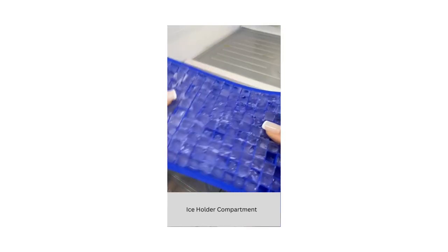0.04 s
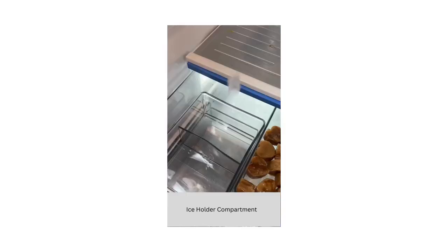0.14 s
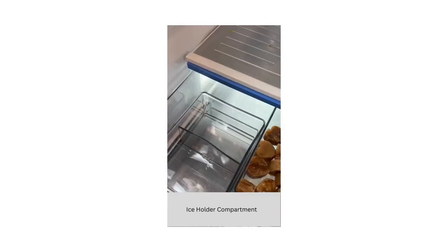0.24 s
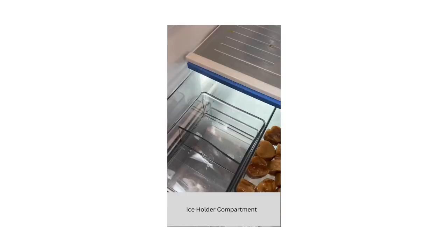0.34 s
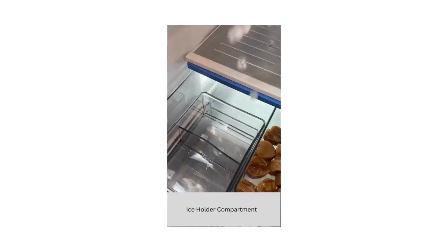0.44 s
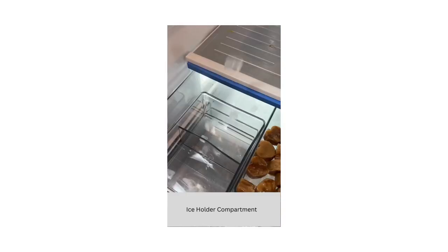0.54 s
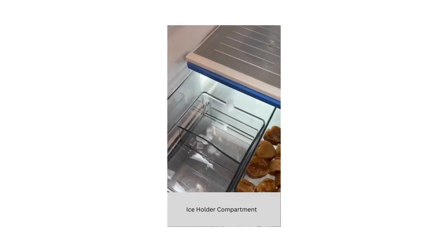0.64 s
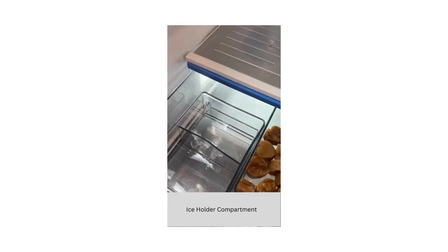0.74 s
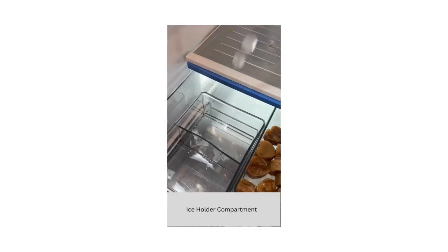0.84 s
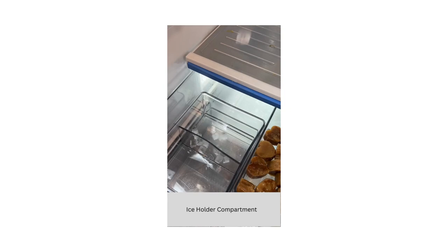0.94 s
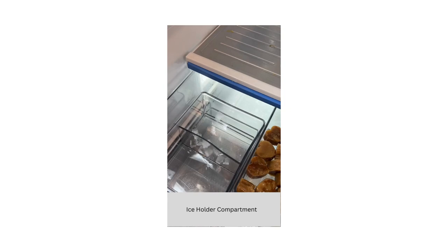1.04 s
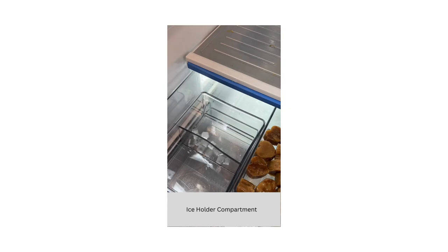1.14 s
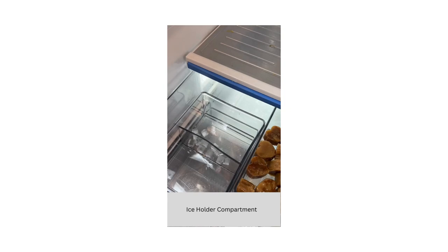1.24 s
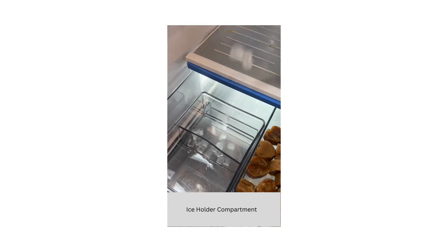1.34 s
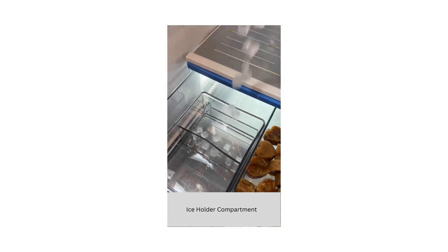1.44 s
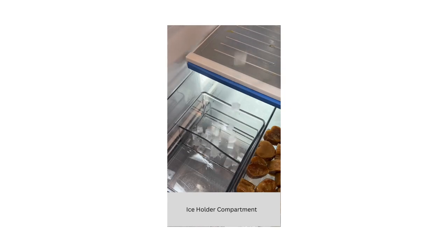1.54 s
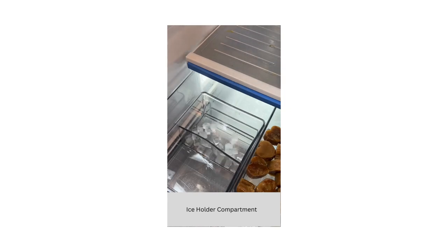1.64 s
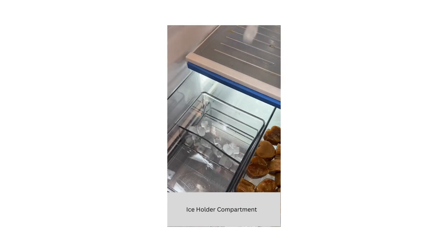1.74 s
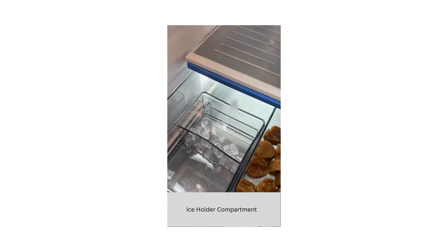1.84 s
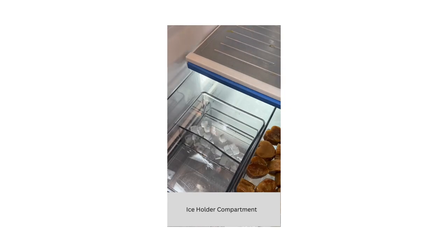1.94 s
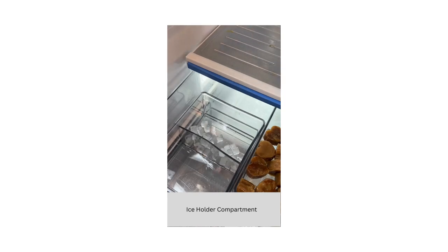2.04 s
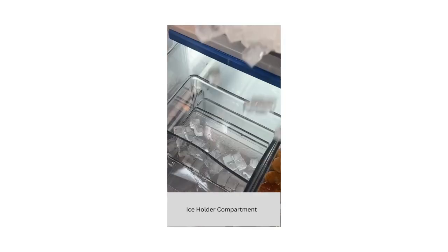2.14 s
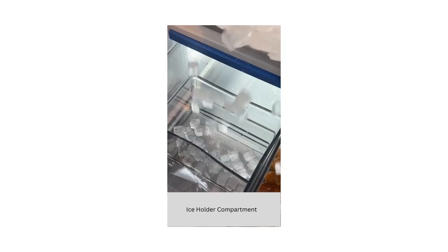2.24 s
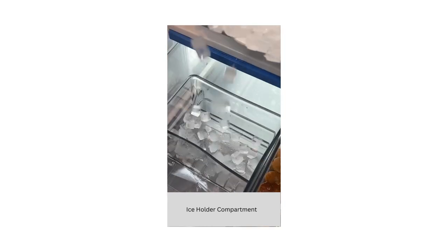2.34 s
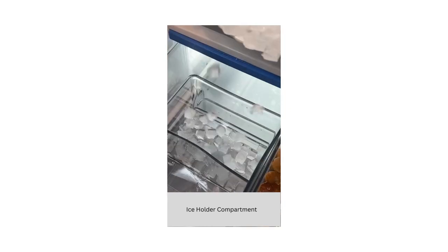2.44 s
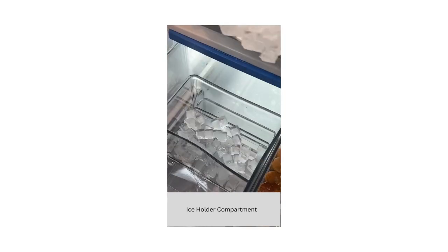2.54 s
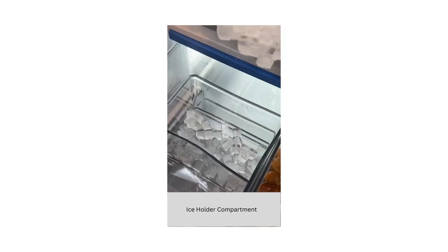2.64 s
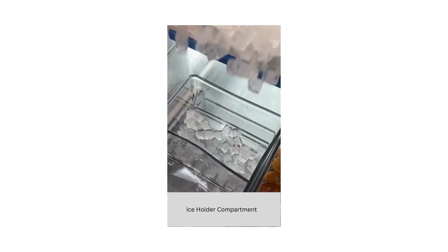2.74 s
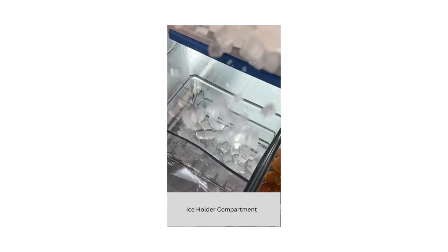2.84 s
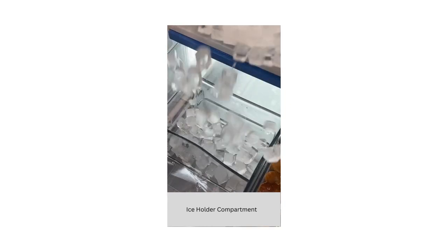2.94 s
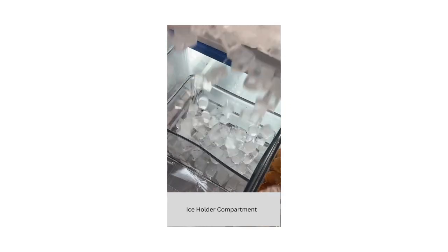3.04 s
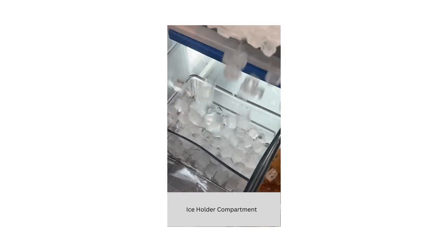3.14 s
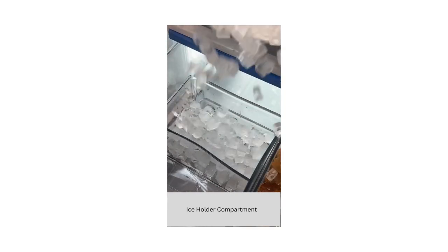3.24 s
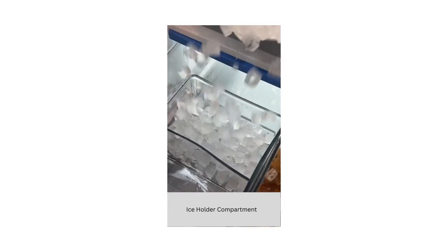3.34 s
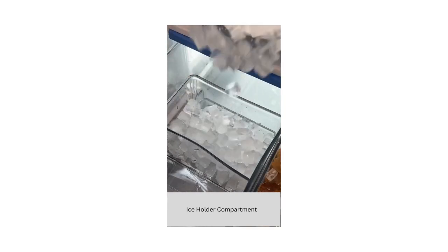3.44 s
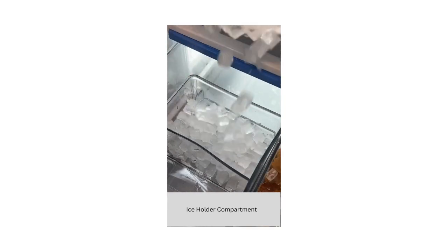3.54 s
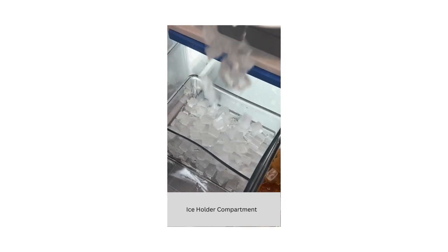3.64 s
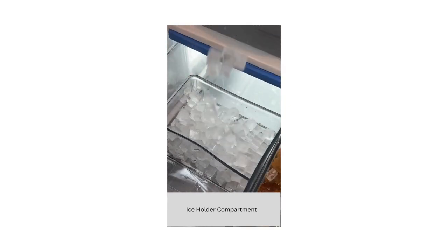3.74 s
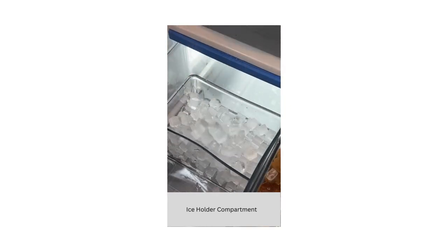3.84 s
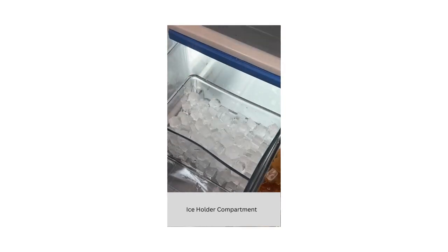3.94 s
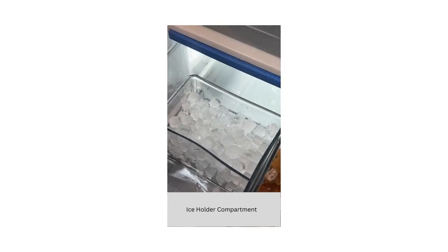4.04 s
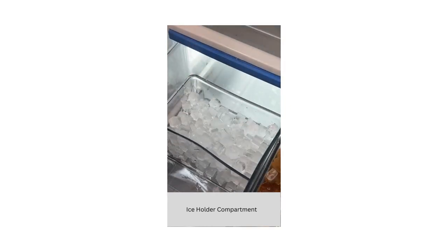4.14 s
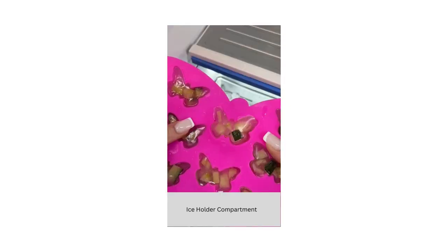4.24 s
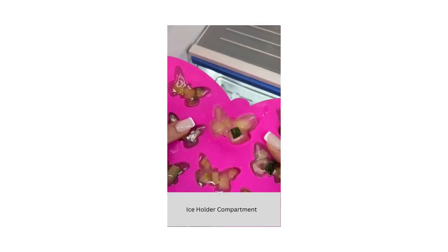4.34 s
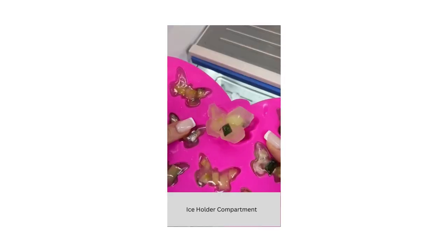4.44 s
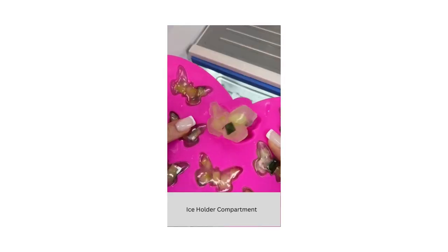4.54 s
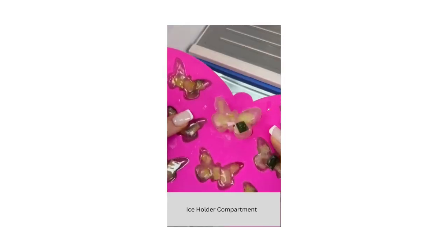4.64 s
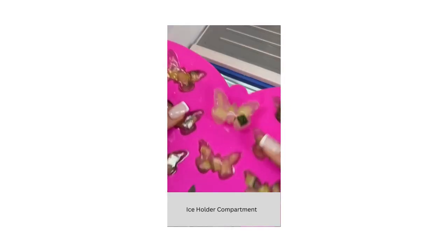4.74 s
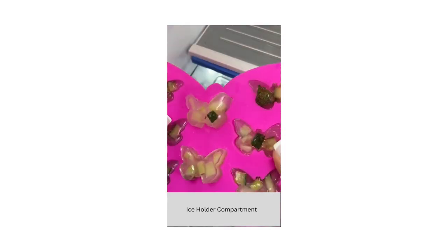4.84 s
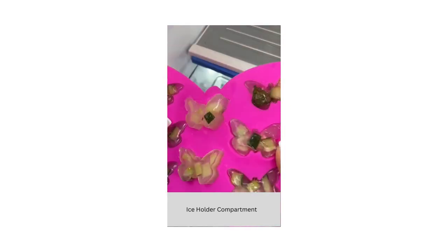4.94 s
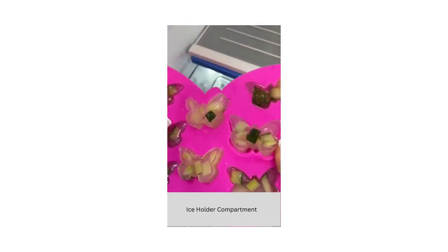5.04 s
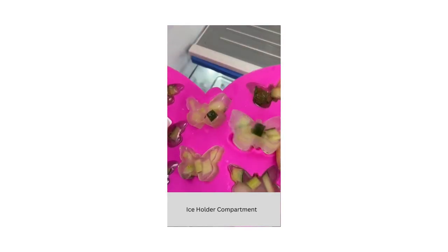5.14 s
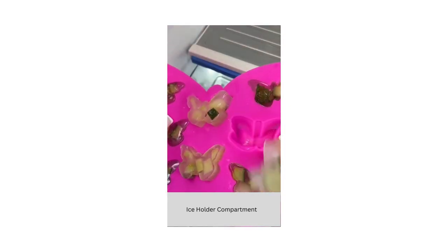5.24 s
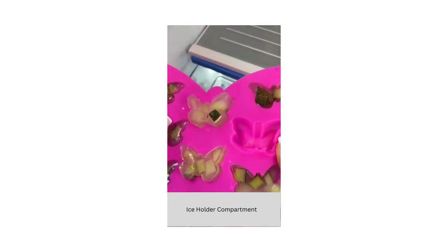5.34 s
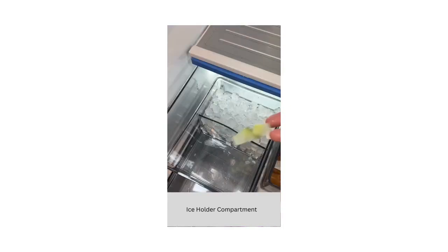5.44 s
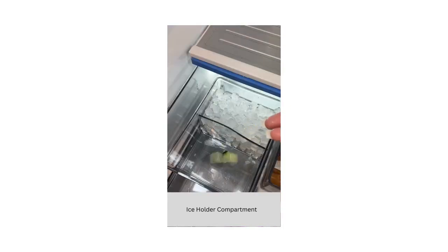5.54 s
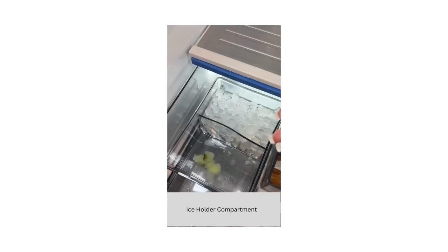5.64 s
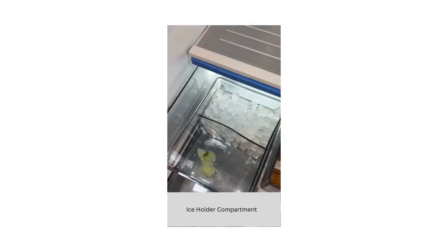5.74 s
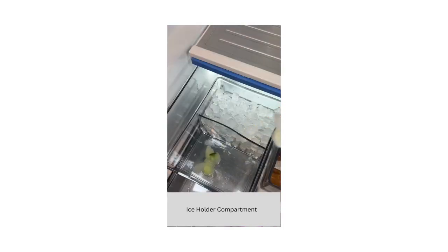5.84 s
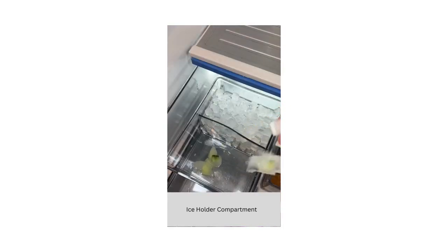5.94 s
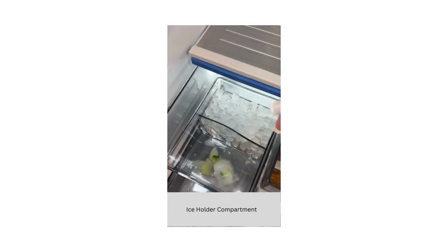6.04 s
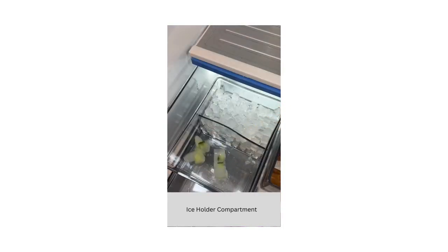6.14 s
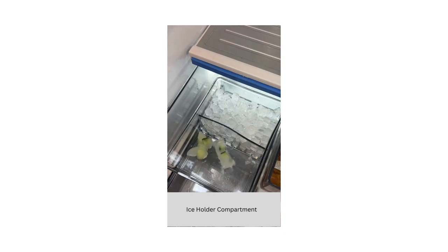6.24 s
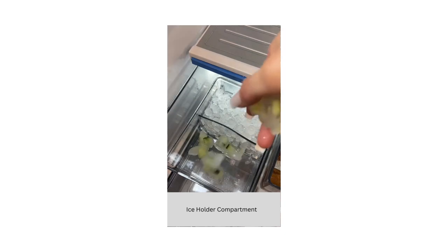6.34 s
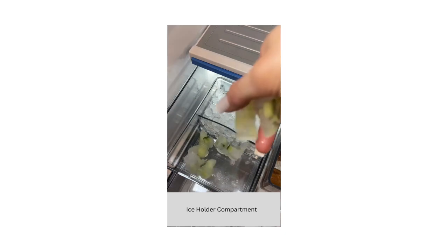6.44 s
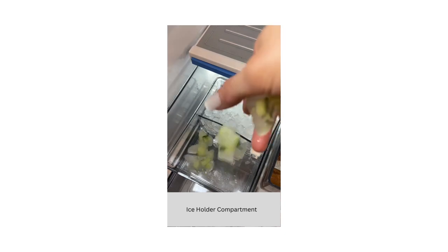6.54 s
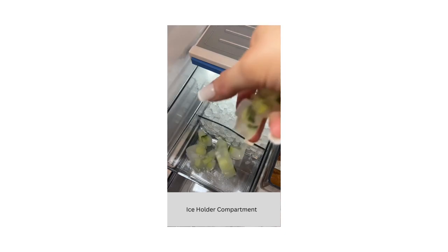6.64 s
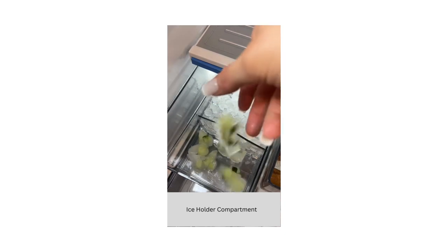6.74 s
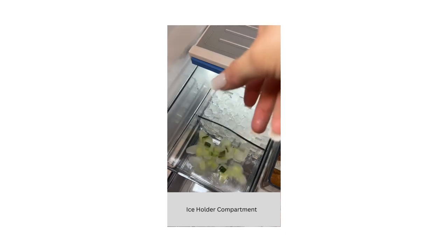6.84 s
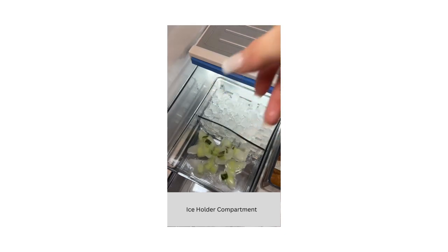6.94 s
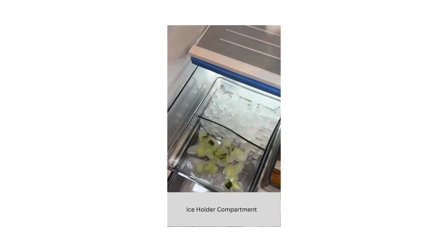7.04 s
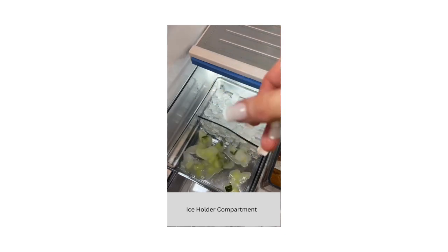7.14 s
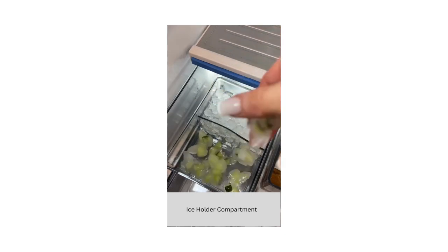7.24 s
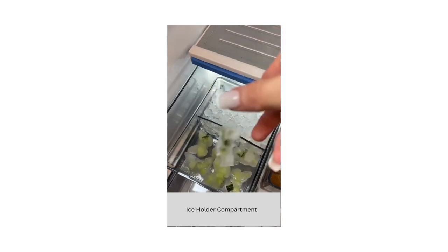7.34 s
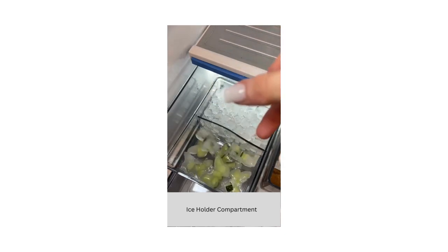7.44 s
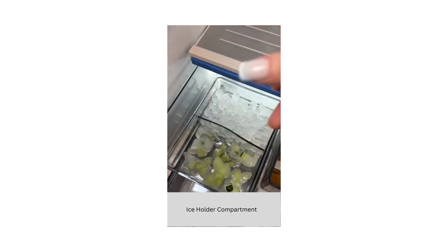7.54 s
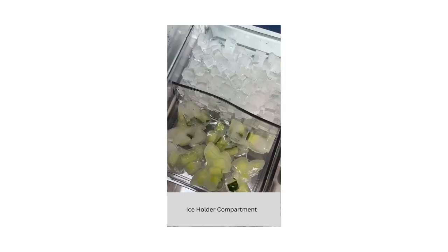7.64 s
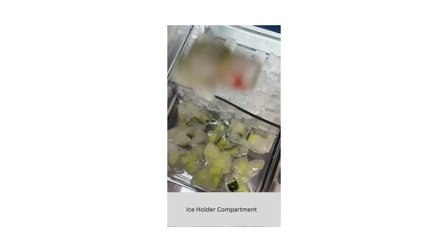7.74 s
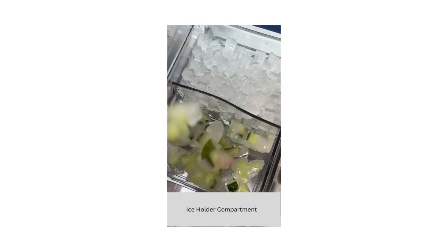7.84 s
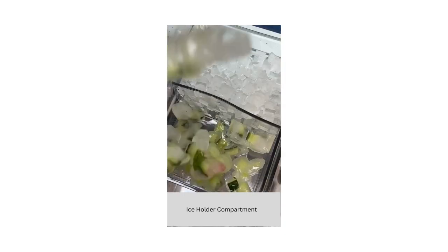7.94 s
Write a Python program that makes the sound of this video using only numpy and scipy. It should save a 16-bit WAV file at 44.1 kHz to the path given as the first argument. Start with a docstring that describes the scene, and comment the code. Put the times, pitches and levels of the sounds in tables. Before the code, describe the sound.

Close in a freezer drawer, small ice cubes hit a hard plastic bin in irregular bursts of bright clacks and hollow knocks. A big tray then empties in a dense clattering pour that thins out. After a quiet gap with faint flexible-tray crackle and soft bumps, larger moulded ice pieces land one after another, duller and heavier, over a faint low hum.

```python
"""Freezer drawer: ice is pressed out of silicone trays into a clear plastic bin. A few small cubes land,
a long pour follows, then larger moulded pieces drop by hand. Each blow sums damped modes: wall knock,
floor thump, ice clack and tick. Loose pieces rattle as filtered showers of small collisions; some ring on.
The flexed tray crackles, dull bumps sound, the drawer adds a short noise echo, the freezer hums."""
import sys
import numpy as np
from scipy import signal
from scipy.fft import rfft, irfft, next_fast_len
from scipy.io import wavfile
from scipy.ndimage import uniform_filter1d

SR = 44100
rng = np.random.default_rng(int(sys.argv[2]) if len(sys.argv) > 2 else 0)


def to_wav(s):
    """Save 16-bit WAV."""
    ch = np.atleast_2d(s).T  # columns
    pcm = np.round(np.clip(ch, -1, 1) * 32767)  # PCM
    wavfile.write(sys.argv[1], SR, pcm.astype(np.int16))


N = 352359
TIME = np.arange(N) / SR
RING = TIME[:8192]  # time axis of one ringing sound [s]

# small cubes landing; hardness is high on ice, low on plastic:
# (time [s], wall note [Hz], strength [dB], hardness [dB], floor thump [dB re strength])
CUBE_BLOWS = [(.2659, 1090, -20.5, 8, -15.5), (.3162, 1146, -21.5, -2, -10), (.367, 2570, -31, 15, -14),
              (.5042, 860, -20, -5, -0.5), (.5945, 1134, -15, 3.5, -18), (.6165, 1030, -19, -4.5, -21.5),
              (.6647, 1100, -14.5, -6.5, -22), (.69, 2220, -22.5, 10.5, -17.5),
              (.7273, 1202, -16, -3, -16.5), (.8032, 1000, -28.5, 19.5, -17), (.967, 1280, -16, 2.5, -28),
              (.9805, 1200, -17.5, -2, -17.5), (1.022, 725, -30, 10, -9.5), (1.0471, 1700, -29, 13, -12),
              (1.061, 895, -26, -6, -2.5), (1.0872, 1130, -25, 2, -13.5), (1.1281, 2100, -20.5, 8.5, -15),
              (1.1803, 1090, -30.5, -9, -7.5), (1.2523, 1180, -26, 3.5, -12.5),
              (1.319, 1200, -25.5, -5.5, -8), (1.3325, 1340, -16, -1.5, -14.5),
              (1.3652, 1560, -16, -2.5, -17.5), (1.3933, 940, -21, 1, -5), (1.4391, 1270, -16, 0.5, -16.5),
              (1.4831, 804, -17, -0.5, -14.5), (1.5176, 1260, -13, 3.5, -16),
              (1.553, 1100, -16, 0.5, -15.5), (1.6315, 1290, -19, 7.5, -18), (1.7026, 1060, -26, 0, -5),
              (1.7787, 1130, -28, -3.5, -7), (1.8488, 1060, -18, -0.5, -18), (1.8746, 990, -25, 0, -11),
              (1.8945, 1220, -18.5, 4.5, -15.5), (2.009, 1200, -28, -0.5, -9.5),
              (2.2006, 1730, -18.5, 6.5, -9), (2.2508, 920, -22, -3, -7.5),
              (2.2729, 984, -17.5, -1.5, -11.5), (2.2845, 1750, -18, 2, -18.5),
              (2.4142, 1020, -19.5, 7.5, -11), (2.4285, 1160, -23.5, 6.5, -17.5),
              (2.4976, 1720, -29, -8, -7), (2.595, 1280, -33, 7.5, -5), (2.7744, 1080, -21.5, 14.5, -10.5),
              (2.8191, 1055, -14.5, 1, -16.5), (2.8449, 1115, -16.5, -5.5, -16),
              (2.9959, 950, -17, 3.5, -19), (3.1099, 2510, -20, -8.5, -13.5), (3.3732, 2470, -24.5, 13, -8),
              (3.4748, 736, -35, -1.5, 4.5), (3.6405, 2450, -30.5, 18, -2.5), (3.6974, 2550, -27, -2, -3.5),
              (3.8444, 990, -33.5, 16, -3.5), (3.8973, 1250, -45.5, -18, 3)]
# moulded pieces coming loose and landing:
# (time [s], wall note [Hz], strength [dB], hardness [dB], floor thump [dB re strength])
PIECE_BLOWS = [(4.9898, 866, -39.5, 2, -2.5), (5.008, 1000, -51, -5.5, -10),
               (5.0529, 870, -43.5, -12.5, -9), (5.1593, 750, -40.5, 3, 4.5), (5.296, 2160, -32, 6, -16),
               (5.301, 2010, -39.5, 0, -11), (5.339, 2110, -40.5, -1, -6), (5.3706, 1830, -41, 0, -5.5),
               (5.5, 1590, -17, -1, -3.5), (5.5623, 1010, -21.5, -6, -11), (5.5695, 1124, -18, -7.5, -6),
               (5.5963, 1590, -30.5, -11, 2), (5.7237, 990, -40, -31, 0),
               (5.7918, 1170, -28.5, -12.5, -4.5), (5.9656, 770, -18, -5.5, 5.5),
               (6.0521, 1030, -18.5, -13.5, 1.5), (6.0952, 1130, -23, -5, 1.5),
               (6.1113, 996, -16.5, -11, -7.5), (6.1413, 1140, -23, -3, 2.5),
               (6.1699, 1120, -17.5, -8.5, -8.5), (6.1966, 1070, -34, -28, 5), (6.2537, 2390, -27, -7, -3),
               (6.3552, 1200, -23, 0, -8.5), (6.4085, 976, -21.5, -14, 0.5),
               (6.5049, 1870, -27.5, -11.5, -5), (6.5469, 1260, -17, 1.5, -10), (6.5986, 1910, -17, 0, -8),
               (6.6308, 1210, -17.5, 0, -4.5), (6.6921, 860, -24.5, -2, -2), (6.766, 1030, -23.5, -17.5, 8),
               (6.8086, 850, -22.5, 14.5, -2), (6.8711, 1590, -28, -9, -1.5),
               (7.0622, 1840, -30.5, -5, -3.5), (7.145, 1066, -16, -4, -9), (7.169, 1080, -18.5, 3, -9),
               (7.2108, 900, -34, -22, 4.5), (7.2516, 880, -25, 1, -9), (7.3122, 1120, -29.5, -7, 4.5),
               (7.386, 890, -13.5, 4.5, -5.5), (7.4147, 750, -30, -8, 11), (7.4305, 1930, -18.5, -5, -15),
               (7.4495, 1096, -13, -1.5, -5.5), (7.486, 990, -22, -9, -16), (7.5035, 1970, -16, -1, -7),
               (7.5853, 1990, -17, 2, -9.5), (7.6602, 2460, -33.5, 29, -29), (7.693, 2440, -35, 24.5, -17),
               (7.7251, 2400, -31, 25, -30), (7.86, 1047, -15, 6, -5), (7.901, 1000, -26, 24, -1),
               (7.9176, 1090, -14.5, -3.5, -5), (7.9577, 1940, -28, -2, -21)]
# flow of cubes from the big tray: (time [s], level [dB])
POUR = [(2.16, -37), (2.204, -30.5), (2.236, -20), (2.286, -15.5), (2.348, -24.5), (2.426, -21.5),
        (2.486, -29.5), (2.502, -20.5), (2.57, -51.5), (2.596, -24.5), (2.686, -45), (2.84, -17),
        (2.924, -21), (3.234, -17.5), (3.268, -42), (3.312, -21), (3.856, -31.5), (4.15, -81)]
# bin floor modes, nominal: (frequency [Hz], level [dB, relative], t60 [s])
FLOOR_MODES = [(108.8, -21.5, 0.43), (171.2, -21, 0.41), (201, -16, 0.13), (284.4, -9.5, 0.16),
               (329, -1, 0.16), (379.3, -1.5, 0.12), (441, 7.5, 0.058), (494.3, 7, 0.059), (576, 6, 0.057),
               (647, 2.5, 0.055)]
# small cubes skittering over the bin: (time [s], length [s], level [dB])
CUBE_SLIDES = [(0.263, 0.065, -28.5), (.565, 0.032, -21), (0.7, .11, -29), (1.202, 0.078, -37),
               (1.32, 0.31, -29.5), (1.751, 0.013, -30), (1.839, 0.051, -27.5), (2.052, 0.045, -55),
               (3.977, 0.11, -55)]
# moulded pieces sliding over each other: (time [s], length [s], level [dB])
PIECE_SLIDES = [(6.101, 0.066, -31.5), (6.232, 0.037, -25), (6.395, 0.013, -24), (6.467, 0.009, -32.5),
                (6.582, 0.074, -22.5), (6.749, .11, -24), (7.061, 0.015, -36), (7.134, .15, -23.5),
                (7.386, .22, -27), (7.631, 0.14, -39), (7.859, 0.052, -17.5)]
# rattle spectrum, small cubes: (frequency [Hz], level [dB, relative])
CUBES_COLOUR = [(59, -35.5), (100, -4.5), (143, -14), (249, -11.5), (358, 1.5), (705, -7.5), (1080, -2),
                (1550, -4.5), (2470, -2.5), (3470, -6.5), (7770, -8), (16000, -25)]
# rattle spectrum, moulded pieces: (frequency [Hz], level [dB, relative])
MOULDED_COLOUR = [(59, -49.5), (100, -5.5), (234, -12.5), (481, -1), (784, -11), (910, -4), (1330, -8.5),
                  (1950, -2), (2220, -6.5), (8830, -23), (16000, -35.5)]
# loose pieces ringing on: (time [s], pitch [Hz], level [dB])
CLINKS = [(2.704, 3650, -37), (2.738, 3780, -43), (7.676, 3800, -40), (7.69, 3820, -40), (7.771, 3780, -41),
          (7.813, 3800, -38)]
# silicone tray flexing: (time [s], length [s], level [dB])
FLEXES = [(.03, 0.12, -50.5), (4.315, 0.12, -55.5), (4.575, .015, -60), (4.63, 0.17, -65), (4.8, 0.02, -60),
          (4.98, 0.028, -49.5), (5.15, 0.087, -55), (5.29, 0.1, -66)]
# tray crackle spectrum: (frequency [Hz], level [dB, relative])
TRAY_COLOUR = [(150, -14.5), (350, -18), (700, 0.5), (1100, -10), (2000, -2.5), (3200, -7.5), (4800, -9),
               (6300, -6.5), (16000, -10.5)]
# dull bumps of hands and heavy pieces: (time [s], reference frequency [Hz], level [dB], t60 [s])
BUMPS = [(4.809, 160, -34, 0.043), (4.997, 183, -34.5, 0.042), (5.024, 65.4, -39, 0.14),
         (5.17, 185, -37, 0.057), (5.306, 195, -42, 0.057), (6.113, 89, -32, 0.42), (6.769, 104, -60, .12),
         (7.422, 116, -34, 0.24), (7.892, 105, -35.5, 0.21)]
# freezer hum: (time [s], frequency [Hz], level [dB])
HUM = [(0, 82, -50), (.5, 82, -56), (1.5, 74, -53), (3.9, 72, -52.5), (4.5, 72, -50.5), (5.3, 74, -49),
       (6.5, 76, -44), (7.99, 78, -53)]
# fan noise spectrum: (frequency [Hz], level [dB, relative])
AIR_COLOUR = [(25, -9.5), (70, 9), (130, -7.5), (200, -15.5), (360, -13.5), (600, -20.5), (1200, -35),
              (2500, -27), (6000, -41.5), (16000, -36)]
# nominal difference between the two microphones: (frequency [Hz], side re mid [dB])
WIDTH = [(100, -26.5), (400, -24), (650, -12), (850, -20), (1200, -17.5), (2000, -24), (4400, -19.5),
         (5200, -11.5), (8000, -9), (12000, -4)]

CLACK_DB, CUBE_TICK_DB, PIECE_TICK_DB = -4.5, -8.5, -12  # re a blow's ice part
TIP_MAX_S, TIP_DB = 0.0046, -9  # edge first, then face: longest delay, level
HEAVY_FROM_DB, HEAVY_RANGE_DB = -23.5, 15.5  # thumps above this level favour the deep modes
ICE_NOTE_HZ, ICE_NOTE_OCTAVES = 2706, .35  # centre and spread of each piece's own ring
ICE_NOTE_DB, ICE_NOTE_T60_S = -8.5, 0.057  # re its clack
POUR_NOTE_HZ, POUR_NOTE_OCTAVES = 1346, .55  # centre and spread of the wall notes
POUR_HARDNESS_DB = 9.5
POUR_THUMP_DB, POUR_THUMP_DB_PER_S = -11, 5.5  # the growing heap passes more of each blow to the floor
POUR_BLOW_DB, POUR_RATTLE_DB, POUR_SPREAD_DB = -4.5, -2, 2.8  # first two re the flow
SLIDE_ATTACK_S, SETTLE_DB_PER_S = 0.0022, 209.5
STIR_DB = -20.5  # each blow shakes the loose pieces, re its strength
LINGER_DB, LINGER_DB_PER_S = -21, 34.5  # a few pieces creep on after the heap has settled
GRAIN_NOTE_DB = -1.5  # small collision: note re crack
FLEX_ATTACK_S, FLEX_RELEASE_DB_PER_S = 0.041, 349
AIR_DB, AIR_SPREAD_DB = -53, 3.1
TOP_HZ = 16000


def ice():
    """Single landings and pour, plus the loose rattle between them."""
    pouring = (TIME > POUR[0][0]) * (TIME < POUR[-1][0])
    flow = undb(curve(POUR) + POUR_RATTLE_DB) * pouring
    cube_motion = np.hypot(flow, jostle(CUBE_BLOWS, CUBE_SLIDES))
    cubes = rattle(cube_motion, CUBES_COLOUR, per_s=380, spread_db=3.0, t60_s=0.04)
    piece_motion = jostle(PIECE_BLOWS, PIECE_SLIDES)
    moulded = rattle(piece_motion, MOULDED_COLOUR, per_s=260, spread_db=3.8, t60_s=.04)
    landed = landings(CUBE_BLOWS, CUBE_TICK_DB) + landings(PIECE_BLOWS, PIECE_TICK_DB)
    return cubes + moulded + landed + pour(count=54)


def landings(blows, tick_db):
    """One blow for each table row."""
    out = np.zeros(N)
    for s, note_hz, db, hardness_db, floor_db in blows:
        add(out, s - .0005, blow(note_hz, db, hardness_db, floor_db, tick_db))
    return out


def pour(count):
    """Poured cubes strike at random, each with its own note, as hard as the flow is strong."""
    out = np.zeros(N)
    times, flow_db = np.transpose(POUR)
    for k in range(count):
        elapsed_s = (k + rng.random()) / count * (times[-1] - times[0])
        pitch, size = rng.uniform(-1.1, 1, 2) * np.sqrt(3)
        s = times[0] + elapsed_s
        note_hz = POUR_NOTE_HZ * 2 ** (POUR_NOTE_OCTAVES * pitch)
        db = np.interp(s, times, flow_db) + POUR_BLOW_DB + POUR_SPREAD_DB * size
        floor_db = POUR_THUMP_DB + POUR_THUMP_DB_PER_S * elapsed_s
        add(out, s, blow(note_hz, db, POUR_HARDNESS_DB, floor_db, CUBE_TICK_DB))
    return out


def blow(note_hz, db, hardness_db, floor_db, tick_db):
    """Ice meets plastic: tick first, then the slower bending waves of wall and floor."""
    out = np.zeros(len(RING))
    # hard contact moves energy from wall knock to ice clack and tick
    ice_db = db + hardness_db / 2
    knock_db = db - hardness_db / 2
    thump_db = db + floor_db

    tip_s = TIP_MAX_S * (1 + rng.random()) / 2
    for delay_s, contact_db in (0, 0), (tip_s, TIP_DB):
        tick = cluster(6000, 16000, 0.074, 0.00017, -10.0, 8.8, count=100)
        clack = cluster(2210, 6000, 0.037, 0.0008, -6.5, 8.1, count=44)
        contact = undb(tick_db) * tick + undb(CLACK_DB) * clack
        add(out, delay_s, undb(ice_db + contact_db) * contact)
    own_hz = ICE_NOTE_HZ * 2 ** (ICE_NOTE_OCTAVES * rng.standard_normal())
    own_ring = ring(own_hz, 0, ICE_NOTE_T60_S, .001, size=2048)
    add(out, 0, undb(ice_db + CLACK_DB + ICE_NOTE_DB) * own_ring)

    note = ring(note_hz, 0, .02, .0011, size=1536)
    overtones = cluster(914, 2300, 0.036, 0.00096, -0.68, 1.9, count=16)
    # a blunt knock sounds the wall's note almost alone
    blunt = np.clip((-CLACK_DB - hardness_db) / 25, 0, 1)
    share = .4 + .5 * blunt
    add(out, 0, undb(knock_db) * (np.sqrt(share) * note + np.sqrt(1 - share) * overtones))

    # longer contact of a heavy piece drives the deep modes harder
    mode_hz, mode_db, mode_t60_s = np.transpose(FLOOR_MODES)
    shift, spot = rng.standard_normal((2, len(mode_hz)))
    heavy = np.clip((thump_db - HEAVY_FROM_DB) / HEAVY_RANGE_DB, 0, 1)
    driven_db = mode_db + 1.5 * spot - 5 * heavy * np.log2(np.maximum(mode_hz, 280))
    floor_hz = mode_hz * (1 + .016 * shift)
    floor_t60_s = mode_t60_s * (.65 + .65 * heavy)
    add(out, 0.0016, undb(thump_db) * ring(floor_hz, driven_db, floor_t60_s, 0.003))
    return out


def rattle(motion, tone, per_s, spread_db, t60_s, size=1800):
    """Shower of small collisions, each a crack and a brief note of its own size and pitch."""
    t = RING[:1024]
    shape = fade(t60_s, t) * (1 - np.exp(-t / 0.0001))
    out = np.zeros(N)
    chance = rng.random((5000, 3))
    cracks = rng.standard_normal((len(chance), len(t))) * shape
    times = np.cumsum(-np.log(chance[:, 0])) / per_s
    for s, (_, rarity, pitch), crack in zip(times[times < TIME[-1]], chance, cracks):
        sine = np.sin(2 * np.pi * 900 * 2 ** (3.2 * pitch) * t)
        note = undb(GRAIN_NOTE_DB) * fade(.025, t) * shape * sine
        add(out, s, undb(-spread_db * np.log(rarity)) * (crack + note))
    out = colour(out, tone)
    power = uniform_filter1d(out ** 2, size=size)
    # the heap's energy is shared among the collisions of the moment
    return out / np.sqrt(np.abs(power) + 1e-4 * power.mean()) * motion


def jostle(blows, slides):
    """Motion of the loose pieces: they slide, each blow stirs them, they settle again."""
    kicks = np.zeros(N)
    for s, _, db, _, _ in blows:
        add(kicks, s, [undb(db + STIR_DB) ** 2])
    stirred = signal.lfilter([1], [1, -undb(-SETTLE_DB_PER_S / SR) ** 2], kicks)
    power = stirred + spells(slides, SLIDE_ATTACK_S, SETTLE_DB_PER_S) ** 2
    keep = undb(-LINGER_DB_PER_S / SR) ** 2
    lingering = signal.lfilter([1 - keep], [1, -keep], power)
    return np.sqrt(power + undb(LINGER_DB) ** 2 * lingering)


def clinks():
    """A free piece rings with a close pair of bending modes and a weaker one above."""
    out = np.zeros(N)
    for s, hz, db in CLINKS:
        add(out, s, undb(db) * ring(hz * np.array([1, 1.03, 1.7]), [0, -7, -13], .05, .001))
    return out


def tray():
    """Silicone peels off the ice with a fine crackle; hands and heavy pieces give dull bumps."""
    flexing = spells(FLEXES, FLEX_ATTACK_S, FLEX_RELEASE_DB_PER_S)
    out = rattle(flexing, TRAY_COLOUR, per_s=300, spread_db=3.5, t60_s=0.028, size=3600)
    out = out * undb(2 * walk(size=700))  # it sticks and lets go
    for s, hz, db, t60_s in BUMPS:
        bump = ring(hz * np.array([.7, 1, 1.6, 2.4]), [3.0, 1, -7, -8.5], t60_s, 0.0037)
        add(out, s, undb(db) * bump)
    return out


def drawer(x, wet_db, t60_s, low_db):
    """Close walls return a dense, short echo; its low part lasts longer."""
    noise = rng.standard_normal((2, len(RING)))
    onset = 1 - np.exp(-(RING / 0.0038) ** 2)
    bright = unit(noise[0] * fade(t60_s) * onset)
    dull = colour(noise[1], [(180, -7), (290, 0), (600, 0), (2000, -7), (12000, -14)])
    low = unit(dull * fade(.3) * onset)
    echo = (undb(wet_db) * bright + undb(low_db) * low) / np.sqrt(len(RING))
    return x + signal.fftconvolve(x, echo)[:N]


def freezer():
    """Hum, a gliding sine plus narrow rumble, over faint, slightly uneven fan noise."""
    tone = np.sqrt(2) * np.sin(2 * np.pi * np.cumsum(curve(HUM)) / SR)
    rumble_colour = [(20, -30), (48, -19), (64, 0), (82, -2), (105, -20), (200, -40), (1000, -80)]
    rumble = unit(colour(rng.standard_normal(N), rumble_colour))
    hum = (.8 * tone + .6 * rumble) * undb(curve(HUM, axis=2))
    fan = unit(colour(rng.standard_normal(N), AIR_COLOUR))
    return hum + undb(AIR_DB + AIR_SPREAD_DB * walk(size=3000)) * fan


def ring(hz, db, t60_s, rise_s, size=8192):
    """Damped modes building up over rise_s; first 12 ms scaled to the energy of rms 1 over 10 ms."""
    t = RING[:size]
    hz, db, t60_s = (np.reshape(v, (-1, 1)) for v in (hz, db, t60_s))
    phase = rng.uniform(0, 2 * np.pi, hz.shape)
    modes = undb(db) * fade(t60_s, t) * np.sin(2 * np.pi * hz * t + phase)
    y = np.sum(modes, axis=0) * (1 - np.exp(-(t / rise_s) ** 2))
    return y / np.sqrt(np.sum(y[:530] ** 2) / 441)


def cluster(lo_hz, hi_hz, t60_s, rise_s, tilt_db, relief_db, count):
    """Many short modes, tilted in dB per octave; the point of contact favours some groups."""
    hz = lo_hz + (hi_hz - lo_hz) * (np.arange(count) + rng.random(count)) / count
    octaves = np.log2(hz / lo_hz)
    relief = relief_db * np.sin(2 * np.pi * (rng.uniform(1.2, 2.8) * octaves + rng.random()))
    return ring(hz, tilt_db * octaves + relief, t60_s, rise_s, size=1536)


def spells(rows, attack_s, release_db_per_s):
    """Gain of (time, length, level) movements: each swells up to its time, holds, dies away."""
    power = np.zeros(N)
    for s, length_s, db in rows:
        swell = np.clip(1 + (TIME - s) / attack_s, 0, 1)
        release_db = release_db_per_s * np.maximum(TIME - s - length_s, 0)
        power += (swell * undb(db - release_db)) ** 2
    return np.sqrt(power)


def walk(size):
    """Random value wandering between stretches of size samples; rms 1."""
    steps = np.repeat(rng.standard_normal(N // size + 1), size)
    return unit(uniform_filter1d(steps, size)[:N])


def colour(x, points):
    """Causal minimum-phase filter with a (frequency [Hz], level [dB]) response."""
    hz, db = np.transpose(points)
    size = 4096
    grid_hz = np.maximum(np.fft.rfftfreq(size, 1 / SR), 1)
    cepstrum = irfft(np.log(undb(np.interp(np.log(grid_hz), np.log(hz), db))))
    # fold the cepstrum to make it causal
    cepstrum[1:size // 2] *= 2
    cepstrum[size // 2 + 1:] = 0
    return signal.fftconvolve(x, irfft(np.exp(rfft(cepstrum))))[:len(x)]


def fade(t60_s, t=RING):
    """Exponential decay, 60 dB in t60_s."""
    return np.exp(-np.log(1000) * t / t60_s)


def curve(rows, axis=1):
    """One table column, joined by straight lines in time."""
    rows = np.array(rows)
    return np.interp(TIME, rows[:, 0], rows[:, axis])


def add(track, s, sound):
    """Mix a sound in at time s."""
    start = max(int(s * SR), 0)
    room = track[start:start + len(sound)]
    room += sound[:len(room)]


def undb(db):
    """Decibels to gain."""
    return 10 ** (np.asarray(db) / 20)


def unit(x):
    """Scale to rms 1."""
    return x / np.sqrt(np.mean(x ** 2))


def scene():
    """Mid holds every source; a wandering, phase-turned copy of it forms the side of the stereo pair."""
    mid = drawer(ice() + clinks() + tray(), wet_db=-10.5, t60_s=0.075, low_db=-22.0) + freezer()
    size = next_fast_len(N)
    grid_hz = np.fft.rfftfreq(size, 1 / SR)
    hz, db = np.transpose(WIDTH)
    spectrum = rfft(mid, size) * undb(np.interp(np.log(grid_hz + 1), np.log(hz), db))
    # wall reflections turn the phase lead back and forth along the spectrum
    turns = np.tanh(4 * np.sin(2 * np.pi * .0011 * grid_hz))
    in_phase = irfft(spectrum, size)[:N]
    lead = irfft(1j * turns * spectrum, size)[:N]
    side = lead * (.7 + .55 * walk(size=300)) + .45 * walk(size=300) * in_phase
    return np.array([mid + side, mid - side])


def record(dry):
    """Round the highest peaks, then low-pass steeply at TOP_HZ."""
    rounded = dry / (1 + np.abs(dry / .9) ** 6) ** (1 / 6)
    return signal.sosfilt(signal.ellip(10, .2, 80, TOP_HZ, fs=SR, output="sos"), rounded)


dry = scene()
out = record(dry)
to_wav(out)
```